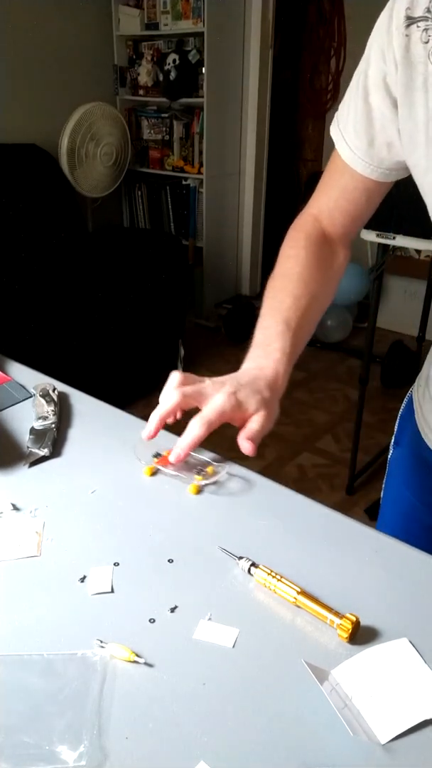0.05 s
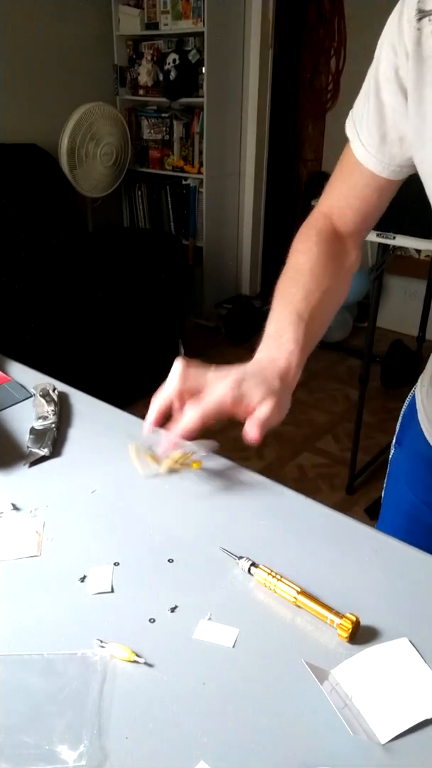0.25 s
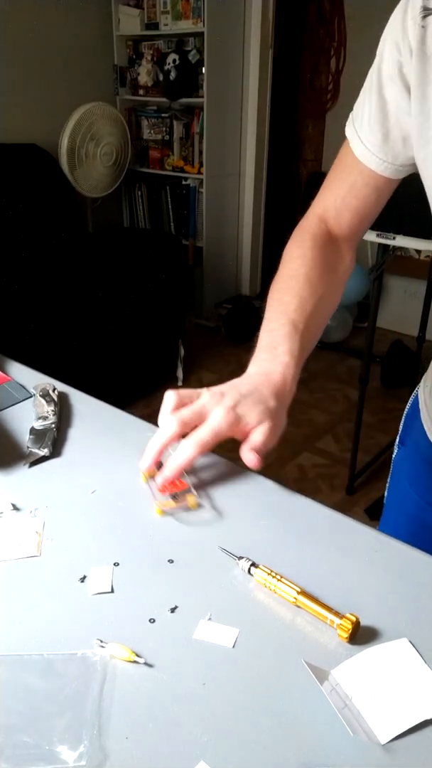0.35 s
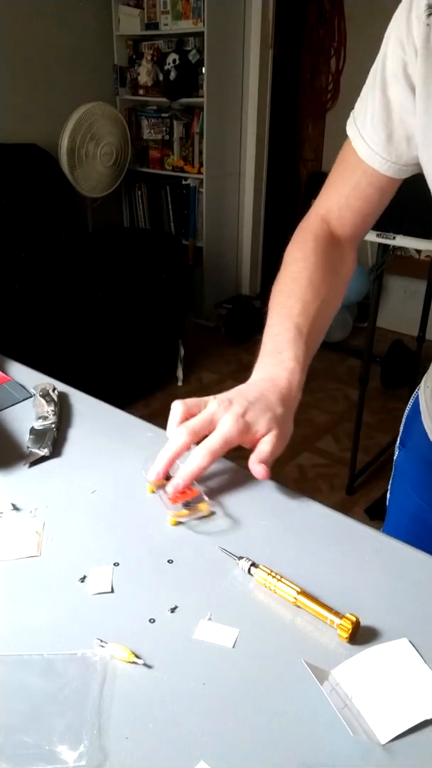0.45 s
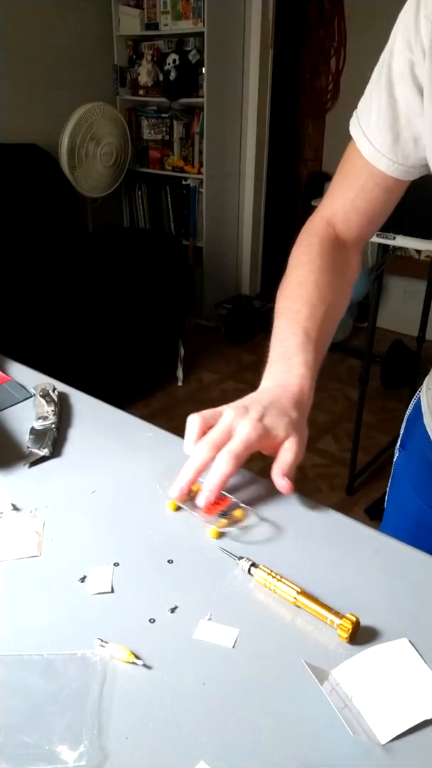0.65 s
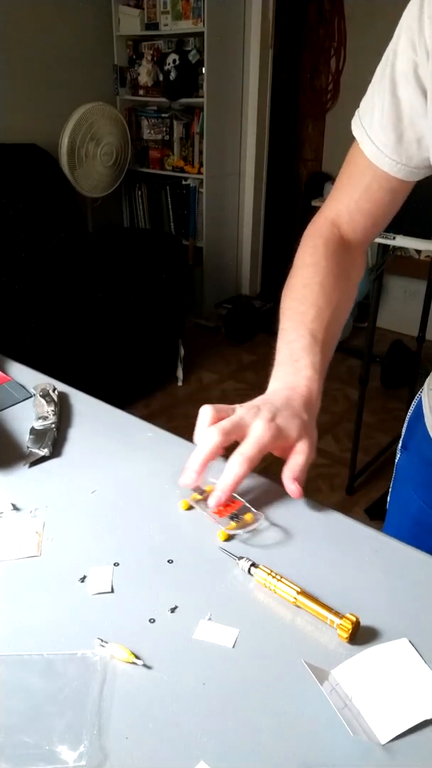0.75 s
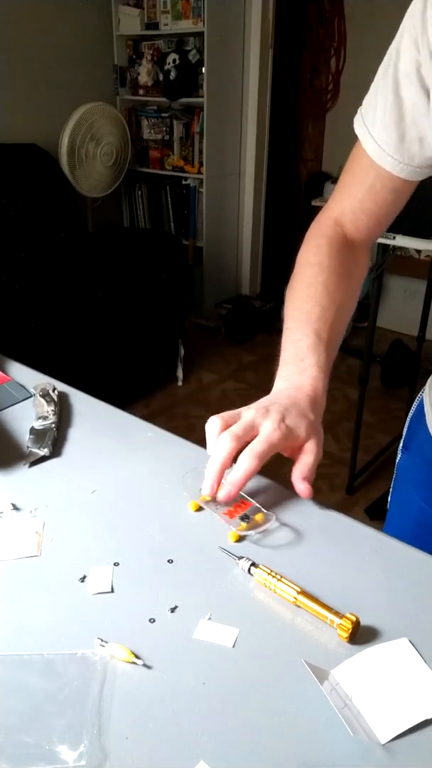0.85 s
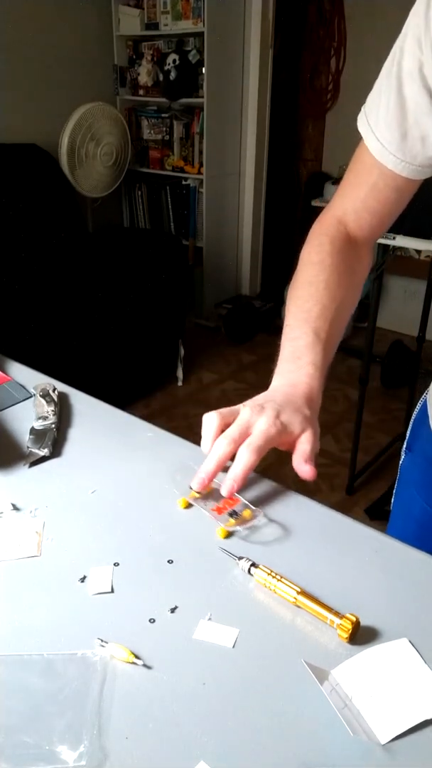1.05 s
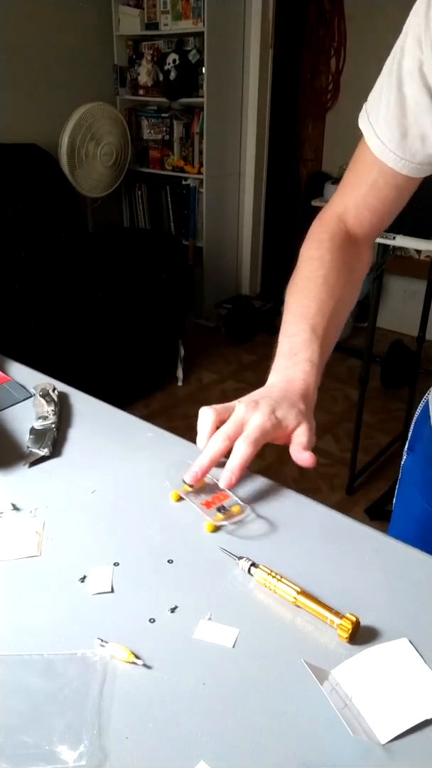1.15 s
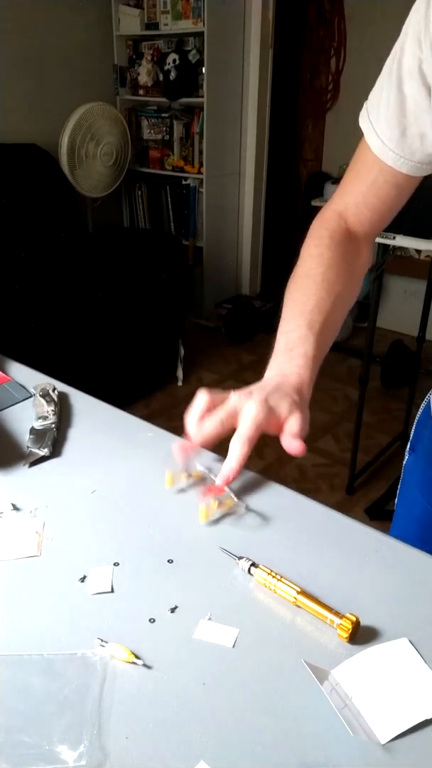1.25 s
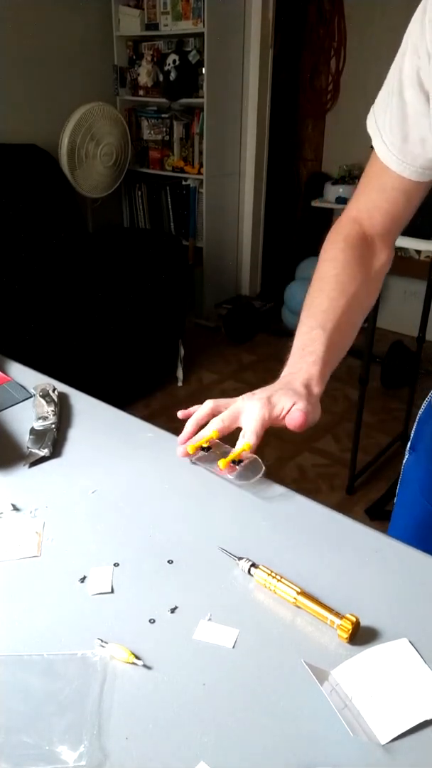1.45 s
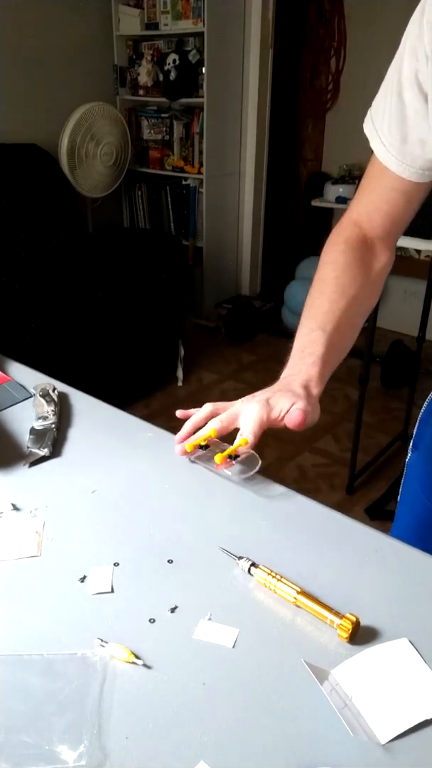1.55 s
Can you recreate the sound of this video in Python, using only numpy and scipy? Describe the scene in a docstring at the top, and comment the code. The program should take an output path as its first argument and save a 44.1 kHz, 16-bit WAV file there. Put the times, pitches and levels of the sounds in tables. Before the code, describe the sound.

A toy fingerboard pops with a sharp clack, lands loudly, then rolls lightly on a tabletop

```python
"""In a small furnished room, a toy skateboard is popped, landed and rolled on a hollow tabletop.
Runs of tiny touches ring deck and tabletop modes as clacks and thumps; soft pushes boom the table.
Random grit shakes the same modes into rumble and rattle, and a wavering tone sings along.
Noise-built reflections and a steady room tone surround it.
A phone hears it close by, cuts the treble above 8 kHz and overloads on the pop and the landing."""
import sys
import numpy as np
from scipy import signal
from scipy.io import wavfile

SR = 44100
rng = np.random.default_rng(int(sys.argv[2]) if len(sys.argv) > 2 else 0)


def gain_from_db(level_db):
    """Convert decibel levels to linear amplitude factors (20 dB per decade)."""
    decades = np.asarray(level_db, float) / 20
    return 10 ** decades


def unload_audio(sound):
    """Save the sound as a 16-bit wav file, at the path given as the first command line argument."""
    columns = np.transpose(np.atleast_2d(sound))
    # keep every value between -1 and 1, then stretch to whole-number steps
    steps = np.round(np.clip(columns, -1, 1) * 32767)
    wavfile.write(sys.argv[1], SR, steps.astype(np.int16))


N = 70560   # samples, 1.6 s

# Loud blows, the pop and then the wheels landing. Each row: start in seconds, length in seconds,
# then relative levels in dB of deep thump, upper thump, deck knock, truck clack and click.
LOUD_BLOWS = [(0.2262, 0.0009, -23.5, -35, -6, -11.5, 4.5), (0.228, .003, -19.5, -28, -10.5, -4.5, 0.5),
              (0.3555, .002, -25.5, -17.5, -6, -0.5, 1.5), (0.3621, 0.0041, -2, -47, 2.5, 7, 4),
              (0.3661, 0.0024, 6, -5, -18.5, -7, 7), (.3760, .013, -4.5, -17, 0.5, -3.5, -5),
              (0.388, 0.0093, 3, 4.5, 9.5, 7, 7.5), (.3975, 0.0051, -3, 3, 10.5, 9.5, 5.5),
              (.4055, .008, 4, 6.5, 4, -30.5, 12.5), (.4245, 0.0028, -29.5, -10, 5.5, 3.5, 0)]
# Light taps of trucks and wheels. Each row: start in seconds, length in seconds,
# then relative levels in dB of deep thump, upper thump, deck knock, truck clack and click.
LIGHT_TAPS = [(0.0171, 0.0056, -41, -55, -43, -18.5, -21.5),
              (0.067, 0.012, -29.5, -63, -16.5, -27.5, -28.5), (0.175, 0.0058, -31, -30.5, -25, -35, -45),
              (0.209, 0.014, -24, -29, -11.5, -23.5, -23.5), (0.2196, 0.0076, -37, -33, -4.5, -20, -26),
              (0.588, 0.011, -72, -59, -19, -23, -42), (.6765, 0.0039, -33, -36, -28, -34, -49),
              (0.718, .016, -32, -34.5, -29, -23, -32), (0.7834, 0.0042, -30.5, -57, -40, -28, -36),
              (0.842, 0.0096, -77, -54, -37, -34, -36.5), (.9197, 0.0028, -60, -66, -31, -29, -33),
              (0.9338, .004, -64, -59, -28.5, -26, -32), (1.1673, 0.0078, -75, -46, -47.5, -35, -39.5),
              (1.180, 0.027, -44, -47, -25.5, -29, -42), (1.2900, .025, -56, -51, -44, -33.5, -32),
              (1.3720, 0.017, -51, -46, -19, -32, -58), (1.382, .014, -54, -32, -24, -31, -23.5),
              (1.404, 0.0049, -28.5, -52, -57, -29.5, -25), (1.4232, 0.013, -36, -55, -46, -30, -21.5),
              (1.4456, 0.0099, -34, -27, -14, -22.5, -21.5), (1.4770, 0.0085, -27, -46, -46, -40, -22),
              (1.4880, 0.016, -40, -43, -44, -31, -36), (1.5170, 0.0082, -37, -47, -31, -28, -30)]
# Ringing modes of deck and trucks. Each row: pitch in Hz, relative level in dB,
# 60 dB decay in seconds when struck.
DECK_MODES = [(1326, -5.5, 0.017), (1415, -1, 0.027), (1550, -8, 0.026), (1960, -10, 0.016),
              (2002, -1.5, 0.02), (2190, -5.5, 0.012), (2330, -12.5, 0.0063), (2947, -8.5, 0.0049),
              (3264, 5, 0.005), (3940, 4, 0.0026), (4207, 0, 0.008), (4820, 1.5, 0.0058),
              (5260, 1.5, 0.0017), (5850, 2.5, 0.0042), (6260, -3.5, 0.013), (6583, -1.5, 0.017),
              (7127, 8, 0.0045), (7518, -6, 0.014)]
# Ringing modes of the tabletop. Each row: pitch in Hz, relative level in dB,
# 60 dB decay in seconds when struck.
TABLETOP_MODES = [(169.9, 1, .14), (205.6, -5.5, .08), (240.2, -2.5, .09), (274.7, -3, 0.1),
                  (316, -4.5, 0.087), (375, -5.5, .07), (409.4, -4.5, 0.079), (483, -5, 0.059),
                  (530.6, -6.5, 0.052), (582, -1, 0.077), (659, -5, 0.053), (768.5, -5, 0.064),
                  (890, -7, 0.053), (1015, -11, .04), (1132, -8, 0.039)]
# Edges in Hz that sort the modes into five parts, deep to high.
PART_EDGES = [0, 340, 1700, 2600, 5200, 9000]
# Rolling, one list before the pop and one after the landing. Each row: time in seconds,
# then relative levels in dB of deep rumble, upper rumble, deck buzz, truck rattle and hiss.
ROLLING_LEVELS = [
    [(0.0, -36, -51, -35, -35.5, -41), (0.024, -47, -46, -40.5, -46, -43),
     (0.054, -36.5, -46, -36.5, -54, -41), (0.076, -59, -36.5, -44, -41, -34.5),
     (0.134, -65, -49.5, -48.5, -57, -62), (0.2, -30, -45, -37, -43.5, -40)],
    [(0.58, -42.5, -52, -39, -41, -42), (0.628, -36, -37, -37.5, -44.5, -48.5),
     (0.79, -41, -46, -48.5, -44.5, -46.5), (0.854, -65, -59, -49, -54, -47.5),
     (0.894, -56, -70, -68, -52, -54), (0.926, -54, -53, -45.5, -47, -46.5),
     (1.006, -72.5, -67, -60, -86, -64.5), (1.144, -43, -46, -65.5, -69, -70),
     (1.188, -42, -46.5, -47, -36.5, -44.5), (1.23, -34.5, -42.5, -41, -58, -47.5),
     (1.25, -45, -56, -73, -61, -77.5), (1.318, -48.5, -42, -52, -45.5, -42),
     (1.36, -56, -56, -65, -57, -40.5), (1.386, -64, -42, -54, -46, -32.5), (1.42, -60, -57, -63, -54, -50),
     (1.448, -46, -48, -67.5, -39.5, -34.5), (1.54, -62, -59.5, -51, -58, -37.5),
     (1.6, -73, -68, -62, -55, -80)],
]
# How long the room rings. Each row: frequency in Hz, 60 dB decay in seconds.
ROOM_DECAY = [(100, 0.48), (500, 0.25), (2000, 0.32), (7000, 0.31)]
# Tone of the reflections. Each row: frequency in Hz, relative level in dB.
ROOM_TINT = [(60, -13), (200, 1), (500, -3), (1200, 8), (1660, -4.5), (2200, 4), (4500, 2.5), (7500, -3.5)]
# Spectrum of the room tone. Each row: frequency in Hz, relative density in dB per Hz.
ROOM_TONE_SPECTRUM = [(18, -31), (30, -4.5), (70, -1), (1260, -53), (2060, -1), (2670, -30), (3220, -12),
                      (7290, -39), (8000, -30), (10400, -79.5), (17600, -120)]
# Soft pushes that make the whole table boom. Each row: time in seconds, relative level in dB.
SOFT_PUSHES = [(0.23, -32), (.255, -32.5), (0.366, -19.5), (0.394, -16.5), (0.622, -37), (0.718, -45.5),
               (1.199, -49), (1.399, -35.5), (1.431, -36), (1.468, -39.5), (1.513, -37)]
# Lowest table modes. Each row: pitch in Hz, relative level in dB, 60 dB decay in seconds.
BOOM_MODES = [(82, -4, 0.24), (103.9, 1.5, 0.22), (116, 6.5, 0.093), (144, 5.5, 0.22)]
# A hum that sings while the wheels roll. Each row: time in seconds, pitch in Hz before waver,
# peak level in dB before flicker.
HUM_PATH = [(.58, 559.7, -67), (0.628, 567, -51), (.69, 589.7, -38.5), (.74, 593, -44), (.80, 591, -61),
            (.95, 595, -60.5), (1.019, 568.3, -71.5), (1.079, 596.6, -59), (1.13, 605, -44.5),
            (1.198, 602, -49.5), (1.25, 604.6, -51.5), (1.298, 593, -44.5), (1.34, 590, -65.5)]

LIFT_S, AIRBORNE_DB = 0.046, -93          # rolling falls away over LIFT_S to this level
GRIT_PER_S, GRIT_SPREAD_DB = 1600, 5
ROLL_DIRECT_DB, ROOM_ROLL_DB, ROOM_HITS_DB = -6.5, -8.5, -8
ROOM_BUILD_S = 0.0023                     # time constant of the reflections' build-up
ROOM_TONE_DB = -49                        # rms before the notch
NOTCH_HZ, NOTCH_WIDTH_HZ, NOTCH_DEPTH = 1640, 260, 0.9   # depth as a share removed
TOUCHES = 12                              # per contact
EVENNESS = 0.7                            # 0 = each mode left to chance, 1 = each gets its share
PUSH_S = 0.0012                           # time constant of a push
HUM_WAVER_HZ, HUM_FLICKER_DB = 16, 4      # typical spread
LOW_CUT_HZ, TREBLE_CUT_HZ, TOP_HZ = 31, 8006, 16200
KNEE = 16                                 # overload sharpness, higher = harder
FADE_FROM_S, FADE_DB_PER_S = 1.489, 87


def rms_one(x):
    """Scale to rms 1."""
    return x / np.sqrt(np.mean(x ** 2) + 1e-20)


def at_hz(points, hz):
    """Read a table on a log-frequency axis."""
    table_hz, values = np.transpose(points)
    return np.interp(np.log(hz), np.log(table_hz), values)


def ring(clicks, hz, t60):
    """A mode as a two-pole resonator: a unit click starts a decaying sine of height 1."""
    r = gain_from_db(-60 / (t60 * SR))
    w = 2 * np.pi * hz / SR
    return signal.lfilter([0, np.sin(w)], [1, -2 * r * np.cos(w), r * r], clicks + 1e-18)


def bands():
    """Centres and third-octave band-passes up to 9 kHz."""
    edges = 28 * 2 ** (np.arange(26) / 3)
    return [(np.sqrt(low * high), signal.butter(2, [low, high], "band", fs=SR, output="sos"))
            for low, high in zip(edges, edges[1:])]


def parts():
    """Tabletop and deck modes grouped by pitch, from deep to high."""
    modes = TABLETOP_MODES + DECK_MODES
    return [[m for m in modes if low <= m[0] < high] for low, high in zip(PART_EDGES, PART_EDGES[1:])]


def drift(rate):
    """Slow chance movement: noise through a two-pole low-pass at rate in Hz, spread 1."""
    r = np.exp(-2 * np.pi * rate / SR)
    settle = SR // 4
    slow = signal.lfilter([1], [1, -2 * r, r * r], rng.standard_normal(N + settle))
    return rms_one(slow[settle:])


def rolling():
    """Grit under the wheels shakes each part of tabletop and deck with random clicks."""
    before, after = map(np.array, ROLLING_LEVELS)
    airborne = [[before[-1, 0] + LIFT_S] + [AIRBORNE_DB] * 5,
                [after[0, 0] - 3 * LIFT_S] + [AIRBORNE_DB] * 5]
    rows = np.vstack([before, airborne, after])
    t = np.arange(N) / SR
    out = 0
    for k, modes in enumerate(parts()):
        grit = (rng.random(N) < GRIT_PER_S / SR) * rng.choice([-1, 1], N)
        grit = grit * gain_from_db(GRIT_SPREAD_DB * np.minimum(rng.exponential(1, N), 4))
        # Each grain shakes only a third of the modes, and they ring slightly shorter than when struck.
        dealt = rng.integers(0, 3, N)
        shaken = 0
        for j, (hz, db, t60) in enumerate(modes):
            shaken = shaken + gain_from_db(db) * ring(grit * (dealt == j % 3), hz, 0.93 * t60)
        level = np.interp(t, rows[:, 0], rows[:, k + 1])
        out = out + rms_one(shaken) * gain_from_db(level)
    return out


def room_tone():
    """Steady background: white noise coloured band by band."""
    settle = 8000
    white = rng.standard_normal((2, N + settle))   # neighbouring bands use different noise
    tone = 0
    for k, (hz, sos) in enumerate(bands()):
        tone = tone + gain_from_db(at_hz(ROOM_TONE_SPECTRUM, hz)) * signal.sosfilt(sos, white[k % 2])[settle:]
    return gain_from_db(ROOM_TONE_DB) * rms_one(tone)


def room(x):
    """Dense reflections: noise that builds up quickly and dies band by band."""
    t = np.arange(int(0.6 * SR)) / SR
    white = rng.standard_normal((2, len(t)))
    tail = 0
    for k, (hz, sos) in enumerate(bands()):
        level = at_hz(ROOM_TINT, hz) - 60 * t / at_hz(ROOM_DECAY, hz)
        tail = tail + signal.sosfilt(sos, white[k % 2]) * gain_from_db(level)
    tail = tail * (1 - np.exp(-t / ROOM_BUILD_S))
    return signal.fftconvolve(x, tail / np.sqrt(np.sum(tail ** 2)))[:N]


def contacts():
    """Each contact is a quick run of touches; each touch strikes every mode with its own strength."""
    start, length, *levels = np.transpose(LOUD_BLOWS + LIGHT_TAPS)
    count = len(start)
    # The first touch falls exactly on the start, the others scatter within their slots.
    scatter = rng.random((count, TOUCHES)) * (np.arange(TOUCHES) > 0)
    when = (np.arange(TOUCHES) + scatter) / TOUCHES
    at = ((start[:, None] + when * length[:, None]) * SR).astype(int)
    # Blows die away along the run; light taps swell and ebb.
    light = np.arange(count)[:, None] >= len(LOUD_BLOWS)
    shape = np.where(light, np.sin(np.pi * (0.2 + 0.75 * when)), np.exp(-1.2 * when))
    fair_share = np.sqrt(np.sum(shape ** 2, axis=1))
    out = np.zeros(N)
    for modes, level in zip(parts(), levels):
        luck = rng.standard_normal((count, TOUCHES, len(modes)))
        for k, (hz, db, t60) in enumerate(modes):
            size = shape * np.sign(luck[:, :, k]) * np.sqrt(np.abs(luck[:, :, k]))
            # Touches add or cancel by their phase at this pitch; part of that chance is evened out.
            total = np.abs(np.sum(size * np.exp(2j * np.pi * hz * at / SR), axis=1))
            even = (fair_share / (total + 0.5)) ** EVENNESS
            gain = even * gain_from_db(level + db - 13) / (1 + 300 / hz)   # deep modes are held back
            size = size * gain[:, None]
            clicks = np.bincount(at.ravel(), size.ravel(), N)[:N]
            out += ring(clicks, hz, t60)
    return out


def booms():
    """Soft pushes, clicks rounded by a two-pole smoother, excite the lowest table modes."""
    start, level = np.transpose(SOFT_PUSHES)
    r = np.exp(-1 / (PUSH_S * SR))
    luck = rng.standard_normal((len(start), len(BOOM_MODES)))   # dB
    out = 0
    for k, (hz, db, t60) in enumerate(BOOM_MODES):
        strength = gain_from_db(level + db + luck[:, k]) * (-1) ** k   # neighbouring modes in opposite sign
        clicks = np.bincount((start * SR).astype(int), strength, N)[:N]
        push = signal.lfilter([(1 - r) ** 2], [1, -2 * r, r * r], clicks)
        out = out + ring(push, hz, t60)
    return out


def hum():
    """A sine near a table mode whose pitch wavers and level flickers by slow chance."""
    s, hz, db = np.transpose(HUM_PATH)
    t = np.arange(N) / SR
    pitch = np.interp(t, s, hz) + HUM_WAVER_HZ * drift(25)
    level = np.interp(t, s, db, left=-120, right=-120) + HUM_FLICKER_DB * drift(20)
    return gain_from_db(level) * np.sin(2 * np.pi * np.cumsum(pitch) / SR)


def scene():
    """Direct sound, reflections and room tone; rolling and room tone are thin near 1.64 kHz."""
    roll = rolling()
    quiet = gain_from_db(ROLL_DIRECT_DB) * roll + room_tone() + room(gain_from_db(ROOM_ROLL_DB) * roll)
    b, a = signal.iirpeak(NOTCH_HZ, NOTCH_HZ / NOTCH_WIDTH_HZ, fs=SR)
    quiet = quiet - NOTCH_DEPTH * signal.lfilter(b, a, quiet)
    hits = contacts() + booms()
    mix = hits + quiet + hum() + room(gain_from_db(ROOM_HITS_DB) * hits)
    return mix[None]   # one channel


def low_pass(x):
    """Removes everything above the highest recorded frequency."""
    return signal.sosfilt(signal.butter(12, 8970, fs=SR, output="sos"), x)


def record(dry):
    """The phone: bass cut, steep treble cut, overload with a rounded knee, a fade at the end."""
    x = signal.sosfilt(signal.butter(2, LOW_CUT_HZ, "high", fs=SR, output="sos"), dry)
    x = signal.sosfilt(signal.ellip(10, 0.5, 90, TREBLE_CUT_HZ, fs=SR, output="sos"), x)
    x = x / (1 + np.abs(x) ** KNEE) ** (1 / KNEE)
    # A second low-pass clears the treble that the overload adds above TOP_HZ.
    x = signal.sosfilt(signal.cheby2(12, 35, TOP_HZ, fs=SR, output="sos"), x)
    fade_time = np.maximum(np.arange(N) / SR - FADE_FROM_S, 0)
    x = x * gain_from_db(-FADE_DB_PER_S * fade_time)
    mix = np.clip(x, -1, 1)
    return low_pass(mix)


dry = scene()
out = record(dry)
unload_audio(out)
```